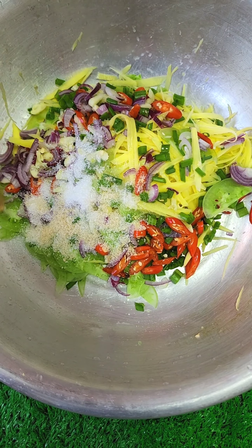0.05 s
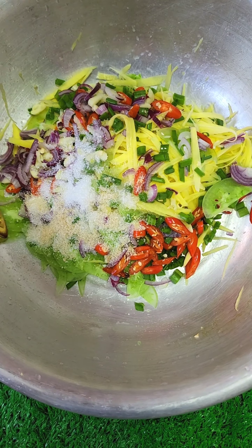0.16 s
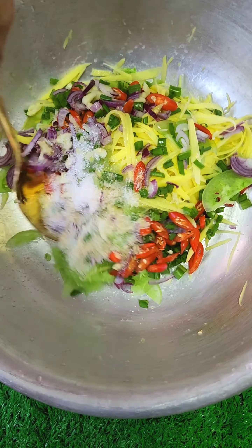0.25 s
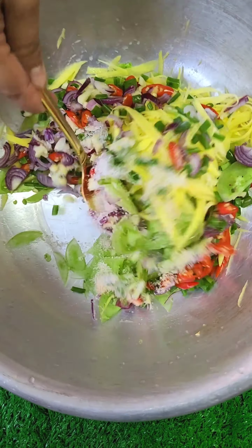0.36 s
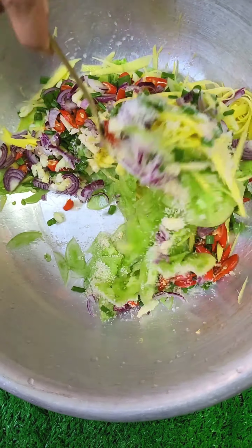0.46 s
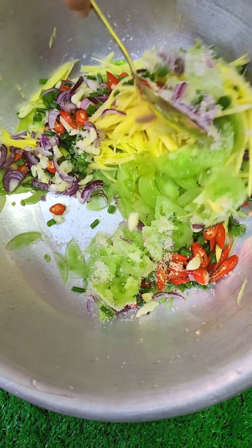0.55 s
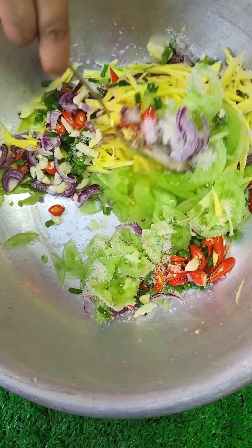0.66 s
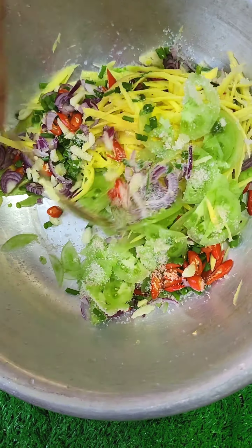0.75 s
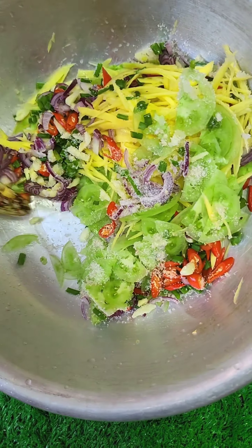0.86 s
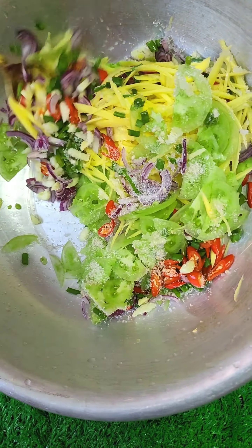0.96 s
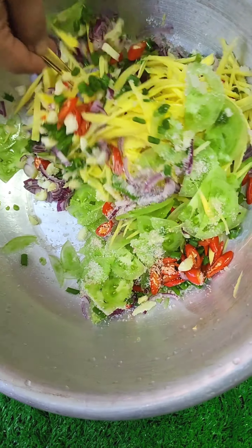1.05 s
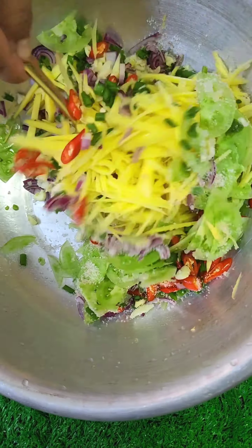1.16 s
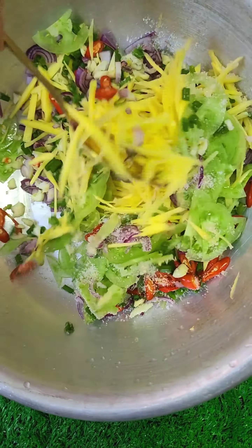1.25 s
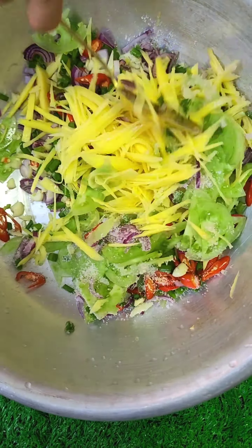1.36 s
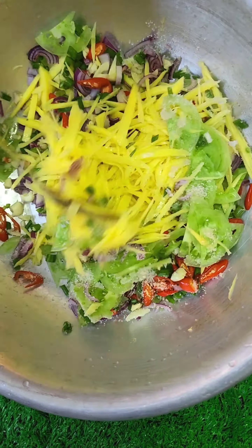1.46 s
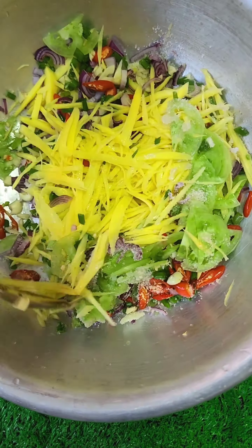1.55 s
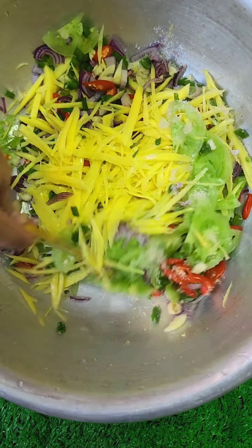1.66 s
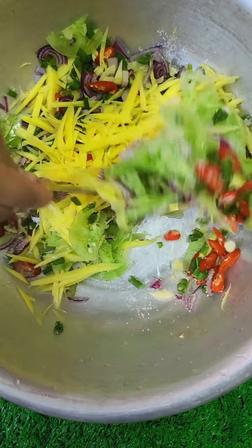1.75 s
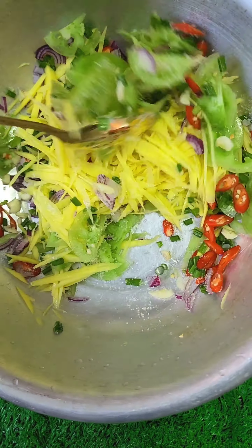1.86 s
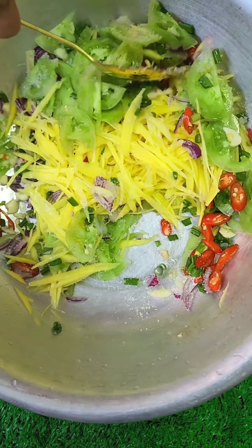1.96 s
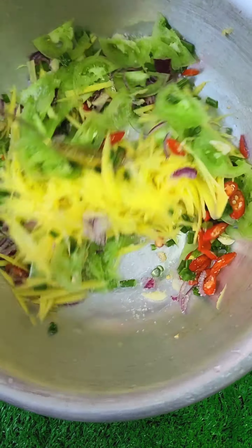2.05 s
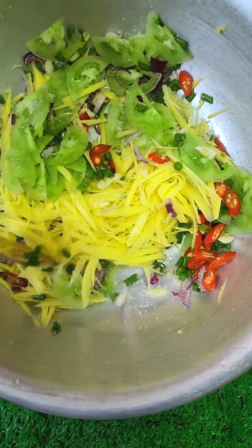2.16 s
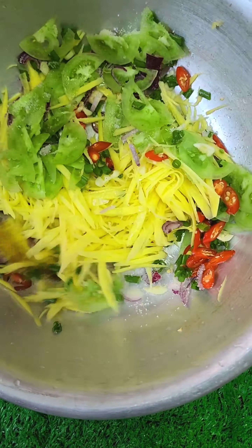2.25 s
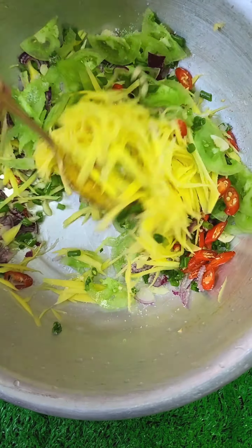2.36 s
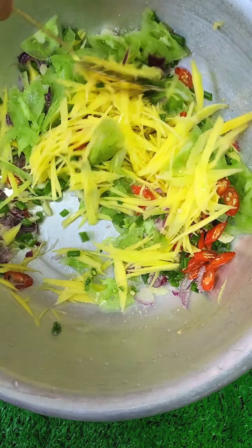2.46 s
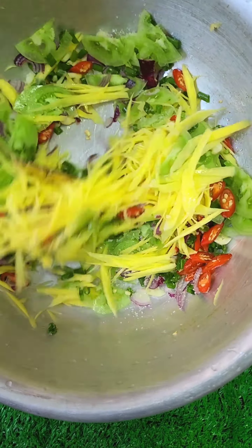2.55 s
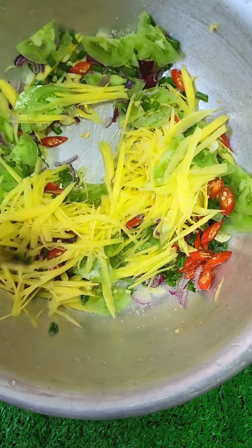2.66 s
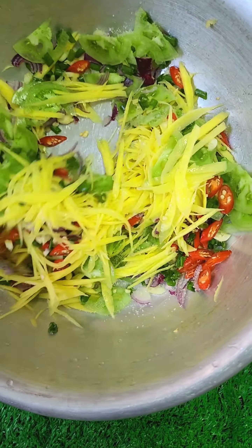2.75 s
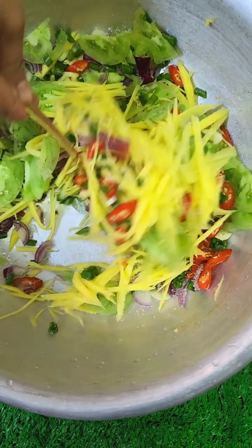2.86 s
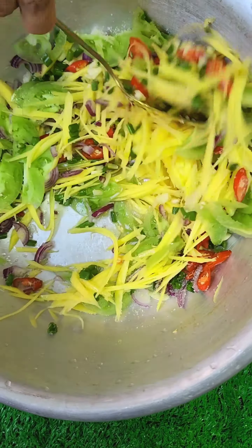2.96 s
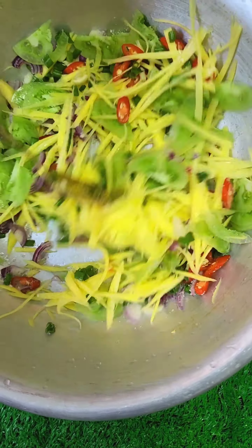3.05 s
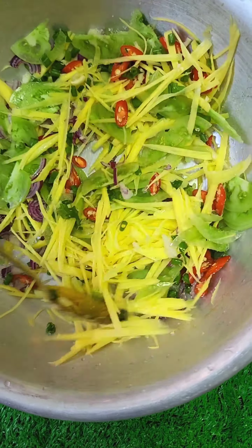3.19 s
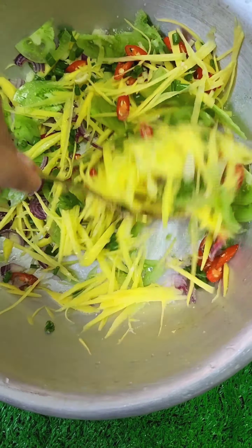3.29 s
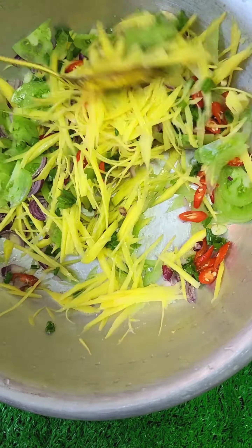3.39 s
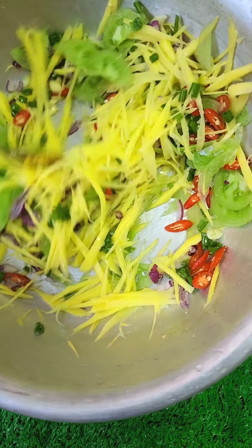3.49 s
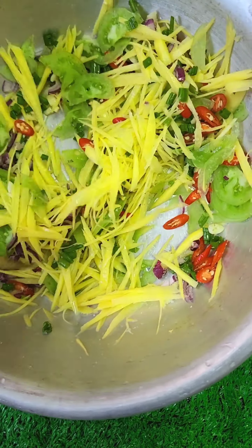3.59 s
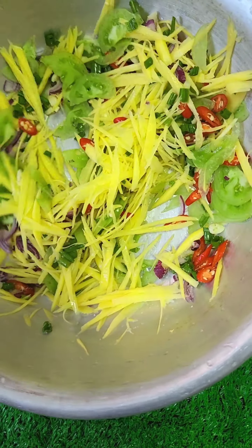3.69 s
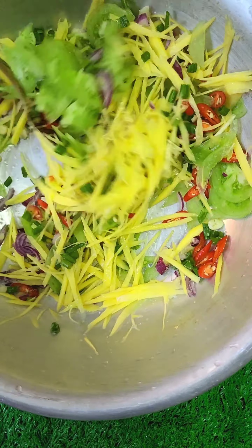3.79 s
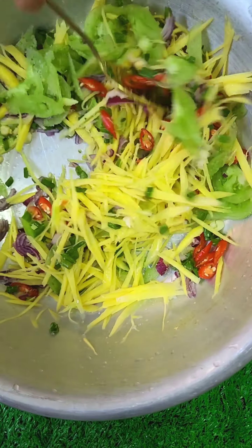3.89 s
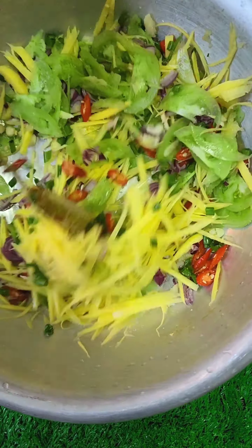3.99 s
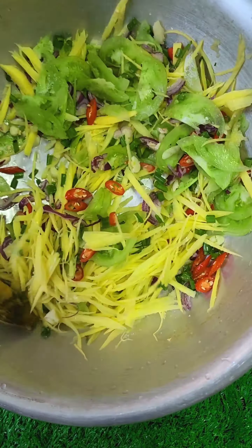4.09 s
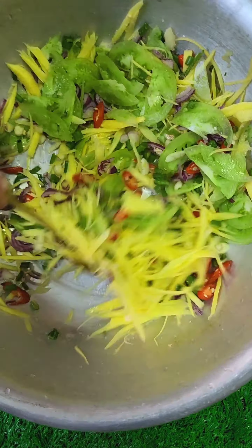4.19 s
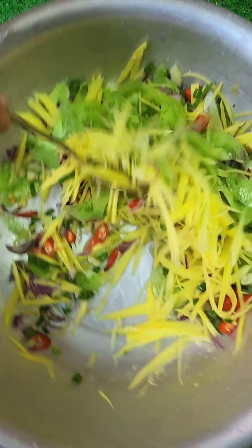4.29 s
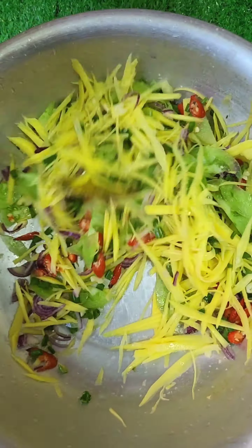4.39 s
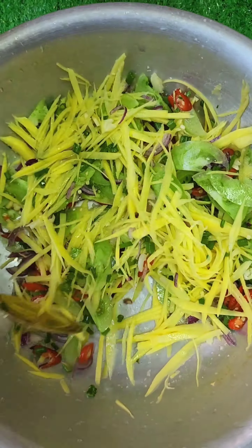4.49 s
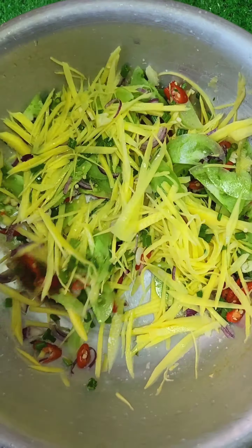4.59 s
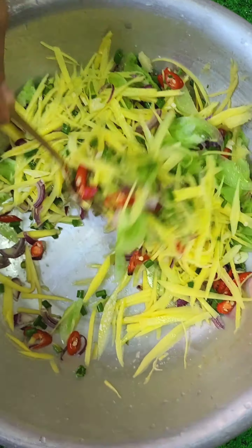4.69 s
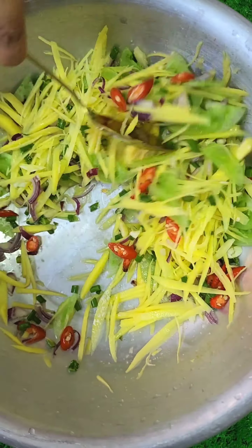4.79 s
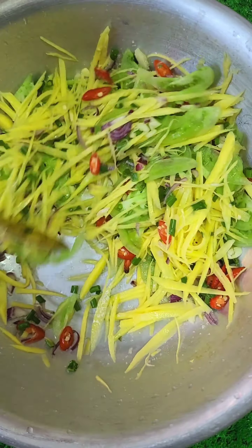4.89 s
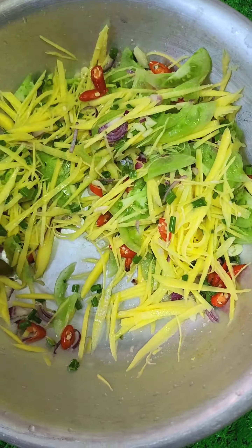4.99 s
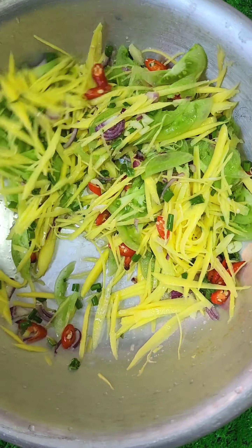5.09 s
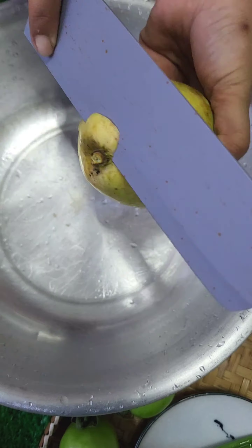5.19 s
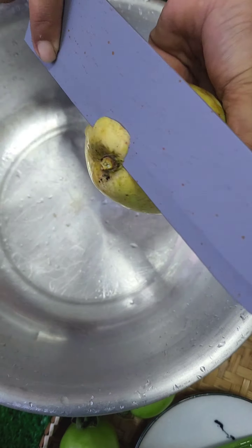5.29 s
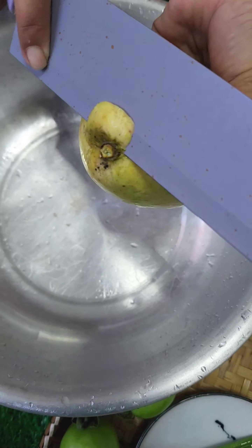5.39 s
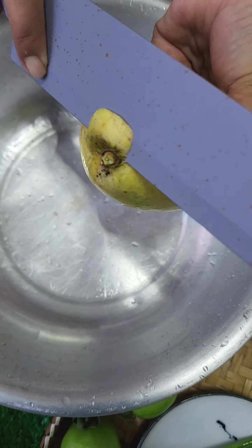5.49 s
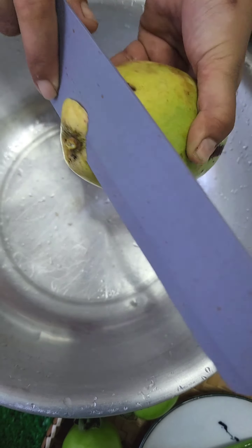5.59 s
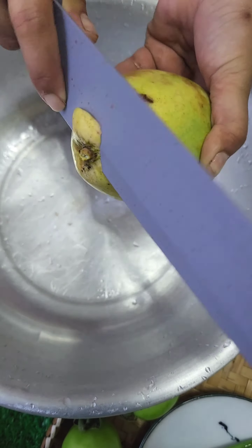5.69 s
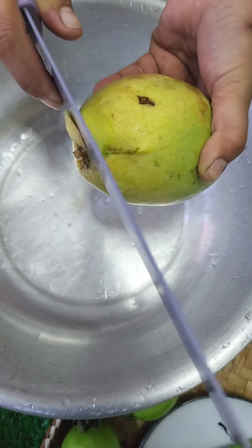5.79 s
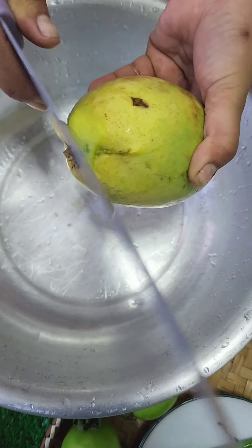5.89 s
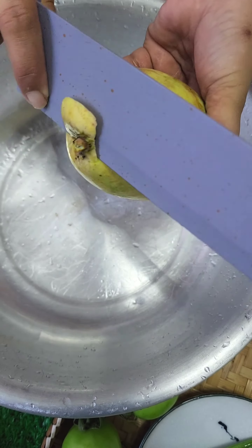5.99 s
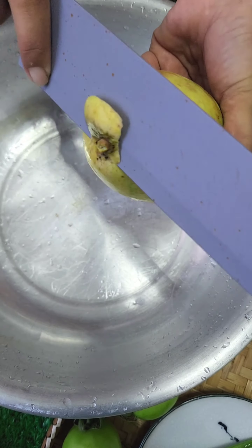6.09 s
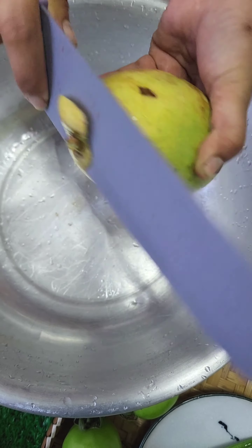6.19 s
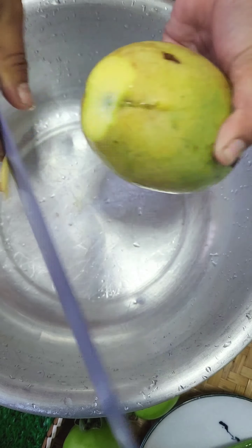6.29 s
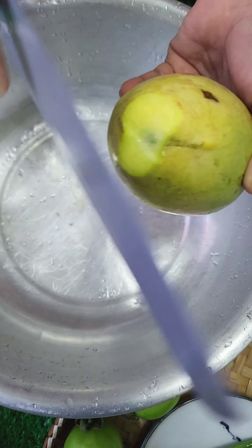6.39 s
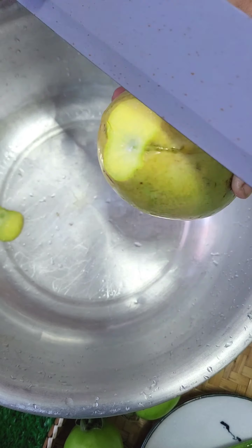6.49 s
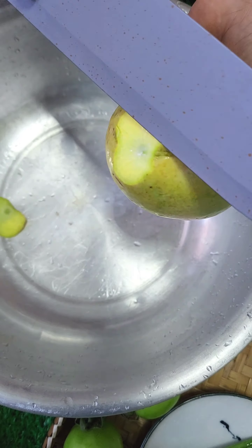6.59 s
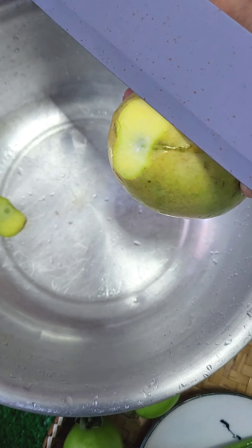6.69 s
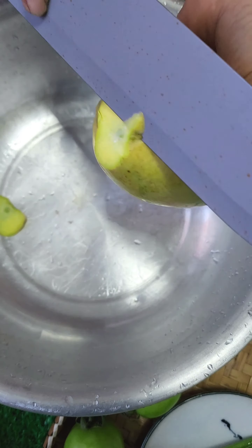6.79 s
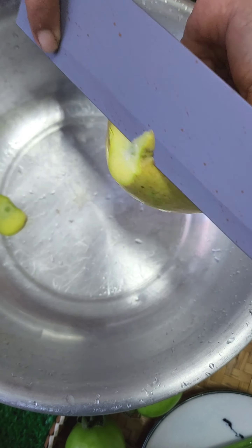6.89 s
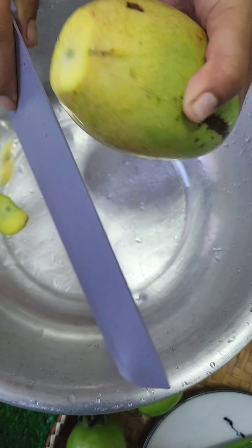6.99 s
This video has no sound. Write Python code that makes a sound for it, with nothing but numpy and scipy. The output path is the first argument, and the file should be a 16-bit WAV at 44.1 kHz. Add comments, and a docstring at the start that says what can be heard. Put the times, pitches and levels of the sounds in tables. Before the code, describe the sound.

Crunchy wet rustling and loud metallic knocks in a metal bowl cut off abruptly, followed by faint fruit cutting and a piece bouncing in steel.

```python
"""Shredded mango salad is tossed with a spoon in a steel bowl: wet strokes are noise made of random grains.
Knocks ring the bowl's damped modes, scrapes are stick-slip noise, and a spoon's beating modes ring at the start.
A low hum of rumble and wavering tones lies under it. This scene cuts off abruptly; after a moment of silence,
in a quieter kitchen, bursts of grainy noise slice the end off a mango and the piece drops into the bowl and
bounces as further knocks. Faint rumble, hiss and tones lie under both scenes."""
import sys
import numpy as np
from scipy import signal
from scipy.fft import rfft, irfft, next_fast_len
from scipy.io import wavfile
from scipy.ndimage import uniform_filter1d

SR = 44100
rng = np.random.default_rng(int(sys.argv[2]) if len(sys.argv) > 2 else 0)


def unload_audio(sound):
    """Save the sound as a 16-bit wav file, at the path given as the first command line argument."""
    columns = np.transpose(np.atleast_2d(sound))
    # keep every value between -1 and 1, then stretch to whole-number steps
    steps = np.round(np.clip(columns, -1, 1) * 32767)
    wavfile.write(sys.argv[1], SR, steps.astype(np.int16))


N = 310890
TIME = np.arange(N) / SR
RING_TIME = np.arange(SR // 2) / SR


def amp(db):
    """Logarithmic level: decibels to linear gain."""
    return 10 ** (np.asarray(db) / 20)


def unit(x):
    """Normalisation of power: scale to rms 1."""
    return x / np.sqrt(np.mean(x ** 2) + 1e-18)


def fade(t, t60):
    """Exponential damping: 60 dB down at t60 seconds."""
    return np.exp(-np.log(1000) * t / t60)


def add(out, start_s, sound):
    """Superposition: mix a sound in at a time."""
    i = max(int(start_s * SR), 0)
    out[:, i:i + sound.shape[1]] += sound[:, :N - i]


def shape(x, gain):
    """Linear filtering: multiply the spectrum by a function of frequency."""
    n = next_fast_len(x.shape[-1], True)
    hz = np.maximum(np.arange(n // 2 + 1) * SR / n, 1)
    return irfft(rfft(x, n) * gain(hz), n)[..., :x.shape[-1]]


def colour(x, points):
    """Spectral envelope: filter by (frequency [Hz], level [dB]) points, then scale to rms 1."""
    hz, db = np.transpose(points)
    return unit(shape(x, lambda f: amp(np.interp(np.log(f), np.log(hz), db, left=-80, right=-80))))


def bell(hz, centre_hz, octaves):
    """Resonance curve: a hump on the octave scale, halved at the given distance from its centre."""
    return 1 / (1 + (np.log2(hz / centre_hz) / octaves) ** 2)


def ports(x, split_hz):
    """Interaural coherence: left and right nearly alike in the bass, unrelated in the treble."""
    side = shape(x[1], lambda f: np.minimum(f / split_hz + 0.073, 1))
    return np.array([x[0] + side, x[0] - side])


def walk(rate):
    """Random modulation: a slow wander joining rate random values per second."""
    knots = rng.standard_normal(int(N / SR * rate) + 2)
    return np.interp(TIME * rate, np.arange(len(knots)), knots)


def crackle(n, rate, spread_db, grain_s, bed_db):
    """Granular noise: random bursts of unequal size set the power of noise drawn apart for each side."""
    struck = rng.random(n) < rate / SR
    sizes = struck * amp(spread_db * np.minimum(rng.exponential(size=n), 4.5))
    power = signal.lfilter([1], [1, -np.exp(-2 / (grain_s * SR))], sizes ** 2)
    # a smooth bed fills the gaps between grains
    level = np.sqrt(power / (power.mean() + 1e-18) + amp(bed_db) ** 2)
    return unit(level * rng.standard_normal((2, n)))


def push(start_s, length_s, rise_s, t60):
    """Envelope of one hand movement: exponential growth, a steady hold, exponential decay."""
    t = TIME - start_s
    return fade(np.clip(-t, 0, 1), rise_s) * fade(np.clip(t - length_s, 0, 1), t60)


def wall(x, scatter_db=2, scatter_t60=.07):
    """Comb filtering: dense close reflections give fixed narrow peaks, different on each side."""
    t = RING_TIME[:SR // 8]
    echoes = unit(rng.standard_normal((2, len(t))) * fade(t, scatter_t60)) / np.sqrt(len(t))
    scattered = signal.fftconvolve(x, echoes, axes=1)[:, :x.shape[1]]
    return (x + amp(scatter_db) * scattered) / np.hypot(1, amp(scatter_db))


def patchy(x, depth_db=3, rate=55):
    """Band-wise modulation: changing contacts make half-octave bands flicker independently."""
    n = next_fast_len(N, True)
    spectrum = rfft(x.astype(np.float32), n)
    hz = np.maximum(np.arange(n // 2 + 1) * SR / n, 1)
    place = np.clip(2 * np.log2(hz / 700), 0, 9)
    out = 0
    for k in range(10):
        weight = np.maximum(1 - abs(place - k), 0).astype(np.float32)
        band = irfft(spectrum * weight, n)[:, :N]
        out = out + band * amp(depth_db * walk(rate) - depth_db / 6)
    return out


# strokes of the spoon through the salad: (full speed from [s], held for [s], rustle level [dB],
# wet fizz relative to rustle [dB], rubbing on the bowl relative to rustle [dB])
STROKES = [(0.293, .08, -43, -3.5, 0.5), (0.478, 0.035, -45, 4, 2), (0.665, 0.034, -47.5, 9, 1.5),
           (0.896, 0.045, -46.5, -7, -4.5), (1.02, 0.15, -40.5, -6.5, -0.5), (1.306, 0.021, -41, -2.5, -3),
           (1.495, 0.012, -48, -9, -0.5), (1.67, 0.17, -40, -7, -6.5), (1.945, 0.033, -53, 12.5, 5.5),
           (2.091, 0.059, -40.5, -6, -4.5), (2.337, 0.028, -35.5, -7.5, -6), (2.565, 0.08, -40.5, -4.5, -3),
           (2.802, 0.072, -37.5, -5.5, -2.5), (3.063, 0.08, -39, -7, -2), (3.282, 0.058, -36, -4.5, -6.5),
           (3.501, 0.08, -39, -7, -3.5), (3.732, 0.12, -42.5, -5, 0.5), (4.024, 0.027, -38.5, -5.5, -3),
           (4.208, 0.16, -39, -6.5, -5), (4.466, 0.023, -34.5, -11.5, -5), (4.658, 0.15, -42.5, -6.5, 0),
           (4.92, 0.0078, -42, -5.5, -3.5)]
# spectrum of shreds sliding over each other: (frequency [Hz], level [dB])
RUSTLE_SPECTRUM = [(900, -15.5), (1300, -6.5), (1600, -3), (2300, -2), (2600, -3.5), (3050, 1),
                   (3450, -0.5), (4200, 0), (5000, -1.5), (6100, -1), (6900, -5.5), (7500, -2.5),
                   (10000, -15.5), (13000, -44)]
# spectrum of the wet fizz: (frequency [Hz], level [dB])
FIZZ_SPECTRUM = [(7500, -14.5), (9500, -9.5), (12000, -8.5), (16000, -12)]
# spectrum of the bowl's body under rubbing, also used by the scrapes: (frequency [Hz], level [dB])
RUB_SPECTRUM = [(150, -30), (290, -4), (450, -9.5), (610, 1.5), (780, -3.5), (950, -8.5), (1170, -0.5),
                (1450, -10.5), (2200, -14.5), (4000, -40.5)]
# times for 60 dB of swell before full speed and of settling after it [s]
STROKE_RISE_S, STROKE_T60_S = 0.25, 0.21
# between strokes the spoon rests on the steel and the heap keeps slipping [dB]
RESTING_RUSTLE_DB, RESTING_FIZZ_DB, RESTING_RUB_DB = -57.5, -62.5, -52.5


def tossing(fizz_t60=.26, rub_t60=0.48, clump_db=2, clumps_per_s=45):
    """Friction noise: each stroke slides wet shreds over each other and drags the spoon along the bowl."""
    rustle = colour(crackle(N, rate=900, spread_db=3.0, grain_s=0.0015, bed_db=-3.5), RUSTLE_SPECTRUM)
    fizz = colour(crackle(N, rate=3200, spread_db=3.5, grain_s=0.0014, bed_db=4.5), FIZZ_SPECTRUM)
    dragging = crackle(N, rate=240, spread_db=2.0, grain_s=0.0028, bed_db=0.5)
    rub = colour(ports(dragging, 710), RUB_SPECTRUM)
    in_salad = TIME > KNOCKS[0][0]  # the resting level starts at the first knock
    sliding = amp(RESTING_RUSTLE_DB) * in_salad
    wetness = amp(RESTING_FIZZ_DB) * in_salad
    pressure = amp(RESTING_RUB_DB) * in_salad
    for s, length, db, fizz_db, rub_db in STROKES:
        sliding = np.maximum(sliding, amp(db) * push(s, length, STROKE_RISE_S, STROKE_T60_S))
        wetness = np.maximum(wetness, amp(db + fizz_db) * push(s, length, STROKE_RISE_S, fizz_t60))
        pressure = np.maximum(pressure, amp(db + rub_db) * push(s, length, STROKE_RISE_S, rub_t60))
    # the shreds give way in clumps
    clumps = amp(clump_db * walk(clumps_per_s))
    shreds = clumps * (sliding * rustle + wetness * fizz) + breaks()
    return wall(shreds, scatter_db=-1, scatter_t60=0.056) + pressure * rub


# breaking shreds: number per second of held stroke, mean peak over the rustle level [dB],
# median centre frequency [Hz], decay [s]
BREAKS_PER_S, BREAK_DB, BREAK_HZ, BREAK_T60_S = 41, 6, 6000, .016


def breaks(spread_db=4):
    """Impulsive fracture: single shreds break at random moments of a stroke, louder in louder strokes."""
    out, t = np.zeros((2, N)), RING_TIME[:SR // 25]
    for s, length, db, _, _ in STROKES:
        for _ in range(int(round(BREAKS_PER_S * length))):
            centre_hz = BREAK_HZ * 2 ** (.5 * rng.standard_normal())
            crack = shape(rng.standard_normal((2, len(t))), lambda f: bell(f, centre_hz, 0.74))
            crack = crack * fade(t, BREAK_T60_S)
            start_s = s + length * rng.random()
            peak_db = db + BREAK_DB + spread_db * rng.uniform(-1, 1)
            add(out, start_s, amp(peak_db) * crack / abs(crack).max())
    return out


# the bowl's modes: (frequency [Hz], level [dB], t60 of the free ring [s])
BOWL_MODES = [(85, -19.5, .25), (225, -15, 0.14), (269, -9, 0.13), (374, -16, 0.11), (424, -7, 0.31),
              (510, -22, .2), (573, 2.5, 0.47), (614, 5.5, 0.33), (699, -4, 0.16), (766, -9, 0.99),
              (934, -11.5, 0.29), (1140, -14, .3), (1030, -11.5, 0.28), (1065, -7, 0.15),
              (1170, 8.5, 0.041), (1306, 3, 0.19), (1431, -24.5, 0.3), (1573, -14, 0.21), (1730, -11, 0.24),
              (1842, -15.5, 0.31), (2110, -11, 0.21), (2280, -15, 0.16), (2900, -19.5, .2),
              (2740, -18.5, .16), (3480, -7.5, .2), (3680, -9, .16), (4290, -19.5, .15)]
# decay of the contact click [s], time the bowl takes to start moving [s], wobble of the ring's phase [rad]
CLICK_T60, CONTACT_S, WOBBLE = .028, .0003, .45


def knock(centre_hz, octaves, ring_db, click_db, held_t60=.034, click_hz=4200, apart_hz=2000,
          rise_s=0.0019, bass_cut=0.31, spill=1.44):
    """Modal synthesis: struck modes die fast under the contact, then ring on; the blow favours a range."""
    hz, db, t60 = np.transpose(BOWL_MODES)[:, :, None]
    gain = amp(db + rng.standard_normal(db.shape))
    favour = bell(hz, centre_hz, octaves)
    t = RING_TIME.astype(np.float32)
    held = favour ** 2 * fade(t, np.float32(held_t60))
    # the free ring spills into modes further from those that were struck
    free = amp(ring_db) * favour ** spill * fade(t, t60.astype(np.float32))
    envelope = held + free
    detuned_hz = hz * (1 + 0.0056 * rng.standard_normal(hz.shape))
    turn = (2 * np.pi * detuned_hz).astype(np.float32) * t
    # the shifting load makes each mode's pitch wobble, so the ring is rough
    wobble_hz = rng.uniform(6, 24, hz.shape)
    turn = turn + WOBBLE * np.sin((2 * np.pi * wobble_hz).astype(np.float32) * t)
    # higher modes start more and more out of step, and differently on the two sides
    opposed = rng.standard_normal(hz.shape) * np.array([1, -1])
    shared = 2.0 * rng.standard_normal(hz.shape)
    phase = np.minimum(hz / apart_hz, 1.2) * (opposed + shared)
    body = (gain * np.cos(phase)).T @ (envelope * np.sin(turn))
    body = body + (gain * np.sin(phase)).T @ (envelope * np.cos(turn))
    body = body * (1 - np.exp(-t / CONTACT_S))
    # a high-pass keeps the knock free of a low thump
    cut_hz = bass_cut * min(centre_hz, 600) / max(octaves, 1)
    body = signal.sosfilt(signal.butter(2, cut_hz, "high", fs=SR, output="sos"), body)
    click = shape(rng.standard_normal((2, len(t))), lambda f: bell(f, click_hz, 0.73))
    click = click * fade(t, CLICK_T60) * (1 - np.exp(-t / rise_s))
    return -body / abs(body).max() + amp(click_db) * click / abs(click).max()


# knocks on the bowl, some built from several rows that colour one hit: (time [s],
# peak of the body [dB], favoured frequency [Hz], spread [octaves], free ring relative to held ring [dB],
# contact click relative to body [dB], left minus right [dB])
KNOCKS = [(0.182, -19, 248, 0.44, 13, -7, 1), (0.191, -29.5, 990, 0.04, 17, -7, -16.5),
          (0.199, -25, 1650, 0.37, 0, -13, -1), (0.89, -43, 400, 2.3, 1, -16, -2),
          (1.06, -12.5, 1900, 2.4, -37.5, -1.5, 1), (1.237, -26.5, 900, 1.2, -9.5, -8.5, 0),
          (1.6752, -3, 493, 1.6, -38, -5, 2.5), (1.694, -17, 650, 1.5, -32.5, 2.5, -7),
          (1.7215, -9.5, 417, 0.72, -29, -0.5, 2.5), (1.743, -5.5, 1844, 0.39, -26.5, -3.5, -3),
          (1.7576, -8.5, 2325, 0.45, -40, -9.5, -1.5), (1.8345, -22, 1690, 0.7, -30, -25, 1.5),
          (1.996, -28.5, 605, 0.39, -19, -25, 2), (2.632, -28, 722, 0.18, -10, -20, 2),
          (2.848, -20.5, 292, 1.17, -18, -13, 7), (3.791, -18, 350, 2.4, -28, 8.5, 1),
          (3.852, -29, 500, 1.8, -26, -22, 6), (4.564, -20, 1840, 0.62, -37.5, -8.5, -0.5),
          (4.6425, -2.5, 750, 1.2, -24, -9, 3.5), (4.6458, -7.5, 680, 1.1, -22, -7.5, -13),
          (4.709, -15.5, 1431, 0.55, -18, -23, -5), (4.718, -15.5, 907, 0.82, -35, -17, 1),
          (5.0253, -2, 830, 0.57, -20, -6, -1.5), (5.127, -23.5, 1133, .5, -4, 4, 3),
          (5.1759, -13.5, 3710, .45, -43, -1, 1), (6.4709, -13.5, 586, 1.17, -21.5, -16.5, 7),
          (6.480, -17.5, 610, 1.23, -30, -17.5, -8), (6.561, -26.5, 575, 1.07, -20, -12, 6),
          (6.576, -28, 1253, 0.26, 4, -3, 1), (6.579, -37, 2160, .15, 7.5, -2, -2)]


def knocks():
    """Impact excitation: the spoon, and later the falling piece of mango, strike the bowl's modes."""
    out = np.zeros((2, N))
    for s, db, centre_hz, octaves, ring_db, click_db, pan_db in KNOCKS:
        side_db = db + np.array([[.5], [-.5]]) * pan_db
        add(out, s, amp(side_db) * knock(centre_hz, octaves, ring_db, click_db))
    return out


# loud snaps of the shreds and light clinks: (time [s], peak level [dB], centre frequency [Hz], t60 [s])
SNAPS = [(0.476, -26, 6400, 0.21), (0.664, -24.5, 6550, 0.31), (1.058, -11, 3600, 0.028),
         (1.302, -17.5, 8900, 0.025), (1.642, -22, 6060, 0.021), (1.669, -24, 6940, 0.024),
         (1.735, -18, 7400, .02), (1.742, -3, 3510, 0.012), (1.929, -25.5, 6340, 0.24),
         (1.993, -21.5, 7050, 0.043), (2.506, -29.5, 9600, .02), (3.04, -23.5, 6200, 0.034),
         (3.421, -29.5, 6800, 0.062), (3.444, -24, 6140, 0.046), (3.664, -25, 9800, 0.021),
         (3.699, -17.5, 6330, 0.055), (3.8, -9, 7700, .035), (4.425, -22, 6180, 0.03),
         (4.465, -19, 3600, 0.033), (5.175, -8.5, 3870, 0.033), (5.623, -28.5, 6680, 0.018),
         (6.346, -18.5, 9940, 0.05)]


def snaps(octaves=0.97, rise_s=0.00034, tone_width=0.076, tone_db=2):
    """Transient radiation: short bright noise cracks, each with a narrow peak for a hint of pitch."""
    out, t = np.zeros((2, N)), RING_TIME[:SR // 10]
    for s, db, centre_hz, t60 in SNAPS:
        crack = shape(rng.standard_normal((2, len(t))), lambda f: (
            bell(f, centre_hz, octaves) + amp(tone_db) * bell(f, centre_hz, tone_width)))
        crack = crack * fade(t, t60) * (1 - np.exp(-t / rise_s))
        add(out, s, amp(db) * crack / abs(crack).max())
    return out


# skids of spoon, blade and cut piece: (time [s], length [s], hiss rms before its swell [dB],
# centre frequency [Hz], spread [octaves], bowl's body relative to hiss [dB])
SCRAPES = [(0.174, 0.032, -32.5, 5810, 0.37, 1.5), (1.062, 0.075, -26.5, 3740, 0.75, -24),
           (1.667, 0.057, -29, 5450, 1.5, 2.5), (1.699, 0.067, -23, 4900, 1.5, -3),
           (1.75, 0.11, -42, 2000, 0.45, -14.5), (3.68, 0.14, -35, 8050, 0.95, -24.5),
           (4.653, 0.062, -9, 7000, 1.9, -21), (4.697, 0.052, -39.5, 3980, 1.4, -5.5),
           (5.038, 0.14, -34.5, 4470, 1.3, -0.5), (5.117, 0.12, -32, 4550, 1.1, -3),
           (5.192, 0.034, -29.5, 4670, 0.33, -20), (5.859, .11, -64, 4390, 0.27, -17.5),
           (6.252, .085, -53.5, 2227, 0.22, -17.5), (6.49, 0.19, -54.5, 3560, 0.6, 8)]


def scrapes(slips=700, squeal_hz=7480, squeal_width=.02, squeal_db=0):
    """Stick-slip: dense slips give a harsh hiss with a narrow squeal, and the bowl's body under it."""
    out = np.zeros((2, N))
    for s, length, db, centre_hz, octaves, body_db in SCRAPES:
        slip = crackle(SR // 4, slips, spread_db=3, grain_s=.001, bed_db=-1)
        hiss = unit(shape(slip, lambda f: bell(f, centre_hz, octaves) * (
            1 + amp(squeal_db) * bell(f, squeal_hz, squeal_width))))
        body = amp(body_db) * colour(ports(slip, 1800), RUB_SPECTRUM)
        skid = (hiss + body)[:, :int(length * SR)]
        swell = np.sin(np.linspace(0, np.pi, skid.shape[1]))
        add(out, s, amp(db) * skid * swell)
    return out


# the bowl is shoved on its mat, and at last the falling piece lands in it: (time [s], level [dB])
THUDS = [(0.883, -34), (1.059, -31), (1.149, -36), (2.317, -29), (2.848, -31), (3.698, -31), (3.792, -30.5),
         (3.849, -30), (5.025, -28), (6.471, -32.5)]


def thuds(base_hz=76, t60=0.063):
    """Damped oscillation: a dull bump under harder pushes and under the piece's landing, its pitch drawn around
    the base."""
    out = np.zeros((2, N))
    for s, db in THUDS:
        hz = base_hz * rng.uniform(0.51, 2.1)
        bump = np.sin(2 * np.pi * hz * RING_TIME) * fade(RING_TIME, t60)
        add(out, s, amp(db) * bump[None])
    return out


# the spoon's modes: (frequency [Hz], level relative to SPOON_DB [dB], t60 [s], beat with a close twin [Hz])
SPOON_MODES = [(1693, 1, 0.12, 14), (3340, -4, 0.3, 13), (4260, -4, 0.16, 64), (5030, -10, 0.26, 18),
               (5700, -15, 0.24, 36), (6960, -15, 0.33, 16), (8700, -19.5, 0.3, 20), (11600, -34, .3, 13)]
SPOON_DB = -40


def spoon():
    """Beating: the spoon rings freely from the start as it is taken up, in close pairs of modes."""
    out = np.zeros((2, N))
    for hz, db, t60, beat_hz in SPOON_MODES:
        turn = 2 * np.pi * (hz * RING_TIME + rng.random((2, 1)))
        pair = np.sin(turn) + .5 * np.sin(turn + 2 * np.pi * beat_hz * RING_TIME)
        add(out, 0, amp(SPOON_DB + db) * fade(RING_TIME, t60) * pair)
    return out


# pushes of the knife through the fruit: (full force from [s], held for [s], flesh level [dB],
# rasp of the peel relative to flesh [dB])
CUTS = [(5.26, .02, -66, -1), (5.46, 0.0087, -64, 0.5), (5.631, 0.03, -46.5, -11.5),
        (6.005, 0.027, -50, -15), (6.123, 0.013, -52, -10), (6.284, 0.022, -46, -11.5),
        (6.345, 0.0066, -53, -1), (6.84, 0.033, -56, -4.5), (6.91, 0.018, -63, -0.5),
        (7.026, .02, -39.5, -7)]
# spectrum of bursting flesh: (frequency [Hz], level [dB])
FLESH_SPECTRUM = [(2500, -18), (4000, 0.5), (6400, 1), (8300, 4.5), (9600, -1.5), (12500, 5), (16000, -1.5)]
# spectrum of the peel's rasp: (frequency [Hz], level [dB])
PEEL_SPECTRUM = [(400, -16), (600, 1), (900, -6.5), (1500, -7), (2000, 0), (2500, -4.5), (3300, -0.5),
                 (5000, -13.5)]
# the blade bites quickly and the sound dies as it stalls: times for 60 dB of rise and of fall [s]
CUT_RISE_S, CUT_T60_S = 0.079, 0.13


def slicing(resting_db=-76, pan_db=3):
    """Fracture noise: the blade bursts the fruit's cells in short pushes and rasps through its peel."""
    cells = colour(crackle(N, rate=630, spread_db=0.0, grain_s=0.0017, bed_db=-16), FLESH_SPECTRUM)
    rasp = colour(crackle(N, rate=1000, spread_db=1.5, grain_s=0.0015, bed_db=-5.5), PEEL_SPECTRUM)
    cut = amp(resting_db) * cells
    for s, length, db, rasp_db in CUTS:
        force = amp(db) * push(s, length, CUT_RISE_S, CUT_T60_S)
        cut = cut + force * (cells + amp(rasp_db) * rasp)
    side_gain = amp(np.array([[.5], [-.5]]) * pan_db)
    return wall(cut, scatter_db=2.0, scatter_t60=0.044) * side_gain


# spectrum of the hum's rumble: (frequency [Hz], level [dB])
HUM_SPECTRUM = [(25, -22), (50, -12.5), (70, -12.5), (90, 0), (110, -3), (140, 5), (175, 2.5), (205, -2),
                (250, -11.5), (330, -20), (430, -13.5), (600, -36.5)]
# wavering tones of the hum: (mean frequency [Hz], median peak level [dB])
HUM_TONES = [(93, -53), (177, -47)]
HUM_DB = -44.5  # rms of the rumble


def hum(waver=0.013, flutter_db=3):
    """Frequency and amplitude modulation: low rumble with two wavering tones, probably a motor nearby."""
    out = amp(HUM_DB) * colour(ports(rng.standard_normal((2, N)), 2500), HUM_SPECTRUM)
    for hz, db in HUM_TONES:
        level = amp(db + flutter_db * walk(8.9))
        turn = 2 * np.pi * np.cumsum(hz * (1 + waver * walk(14))) / SR
        out = out + level * np.sin(turn)
    return out


# spectrum of the kitchen's rumble and hiss: (frequency [Hz], level [dB])
AIR_SPECTRUM = [(25, -18), (55, -17.5), (90, 4.5), (115, 0), (170, -10.5), (300, -12), (380, -30),
                (500, -17), (750, -24.5), (1300, -33), (5000, -40), (8100, -42), (9600, -60),
                (16000, -47.5)]
# faint tones of steady pitch: (frequency [Hz], median peak level [dB])
AIR_TONES = [(2890, -81.5), (292, -72.5), (426, -77.5)]
AIR_DB = -54  # rms of the rumble and hiss


def air(flutter_db=-2.0):
    """Stationary noise: the kitchen's own rumble and hiss, with faint tones of wandering level."""
    out = amp(AIR_DB) * colour(ports(rng.standard_normal((2, N)), 1500), AIR_SPECTRUM)
    for hz, db in AIR_TONES:
        out = out + amp(db + flutter_db * walk(3.4)) * np.sin(2 * np.pi * hz * TIME)
    return out


def kitchen(x, wet_db=-8, low_t60=0.49, high_t60=0.21, high_db=-3, split_hz=2500, build_s=0.0016):
    """Reverberation: add a short diffuse echo whose treble dies first."""
    noise = ports(rng.standard_normal((2, len(RING_TIME))), 1300)
    low = shape(noise, lambda f: 1 / (1 + (f / split_hz) ** 2))
    high = amp(high_db) * (noise - low)
    tail = low * fade(RING_TIME, low_t60) + high * fade(RING_TIME, high_t60)
    tail = tail * (1 - np.exp(-RING_TIME / build_s))
    tail = unit(tail) / np.sqrt(len(RING_TIME))
    return x + amp(wet_db) * signal.fftconvolve(x, tail, axes=1)[:, :N]


# end of the tossing, start of the quieter kitchen, start of its knocks and skids [s]
STOP_S, RESUME_S, SLICE_START_S = 5.224, 5.256, 5.6


def scene():
    """Superposition in two scenes: tossing over the hum, a moment of silence, then slicing."""
    skids = patchy(wall(scrapes(), scatter_db=0.0, scatter_t60=0.085), depth_db=3.0, rate=71)
    contacts = kitchen(knocks(), wet_db=-11.5) + kitchen(snaps() + skids, wet_db=-15.5) + thuds()
    shreds = patchy(tossing(), depth_db=3, rate=55)
    salad = shreds + kitchen(spoon(), wet_db=1.0) + hum() + contacts
    fruit = slicing() + contacts * (TIME > SLICE_START_S)
    # gates with edges softened over 128 samples
    before = uniform_filter1d((TIME < STOP_S) * 1., size=128)
    after = uniform_filter1d((TIME > RESUME_S) * 1., size=128)
    return before * salad + after * fruit + (before + after) * air()


TOP_HZ = 15900  # upper limit of the treble


def record(dry, dip_hz=9900, dip_octaves=0.15, dip_db=-5.5, top_db=-3):
    """Transducer response: the microphone dips in the treble, clips at full scale and cuts the top."""
    heard = shape(dry, lambda f: amp(
        dip_db * bell(f, dip_hz, dip_octaves) + top_db * bell(f, TOP_HZ, 0.063)))
    low_pass = signal.ellip(10, .2, 80, TOP_HZ, fs=SR, output="sos")
    return signal.sosfilt(low_pass, np.clip(heard, -1, 1))


dry = scene()
out = record(dry)
unload_audio(out)
```